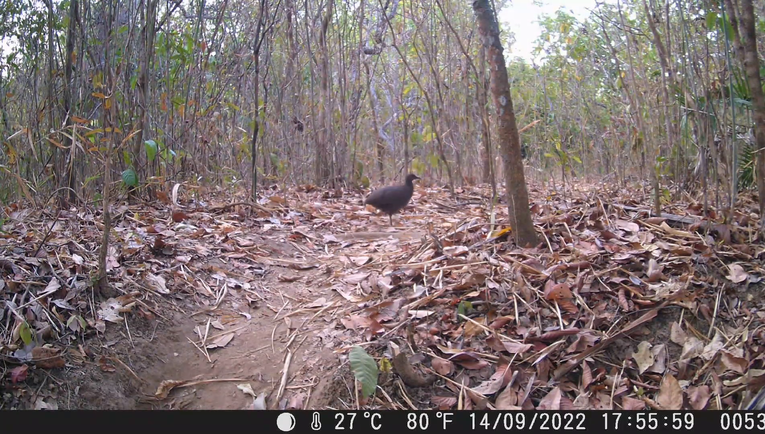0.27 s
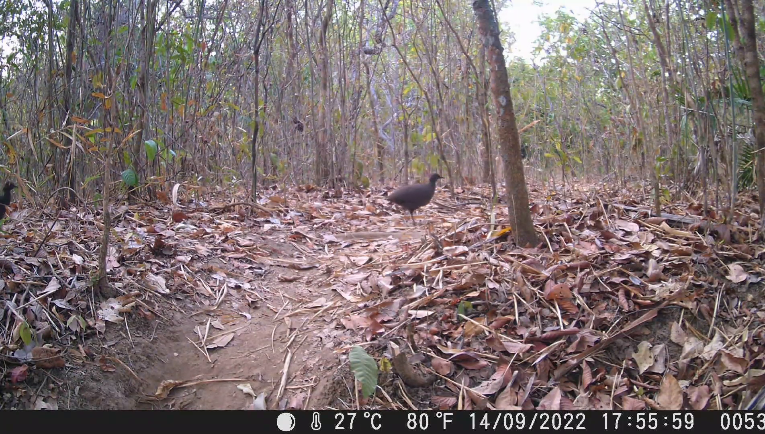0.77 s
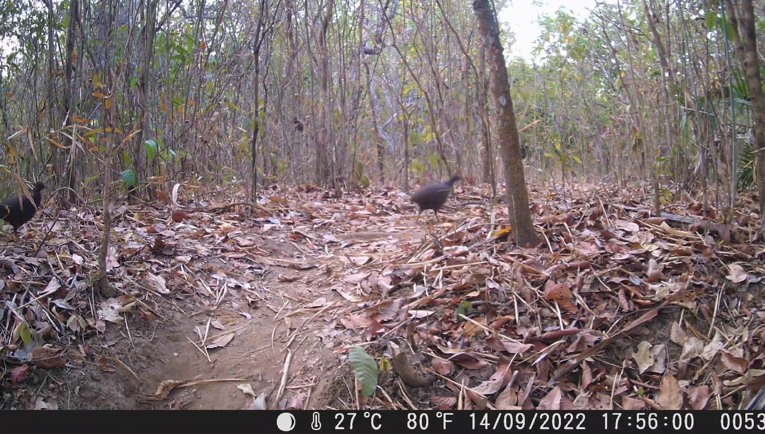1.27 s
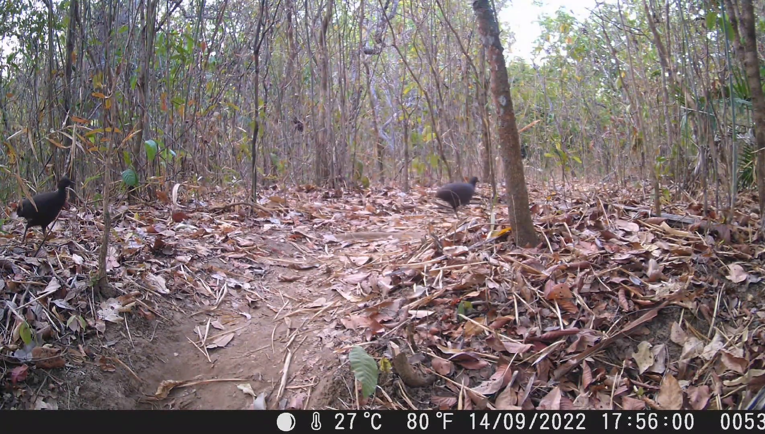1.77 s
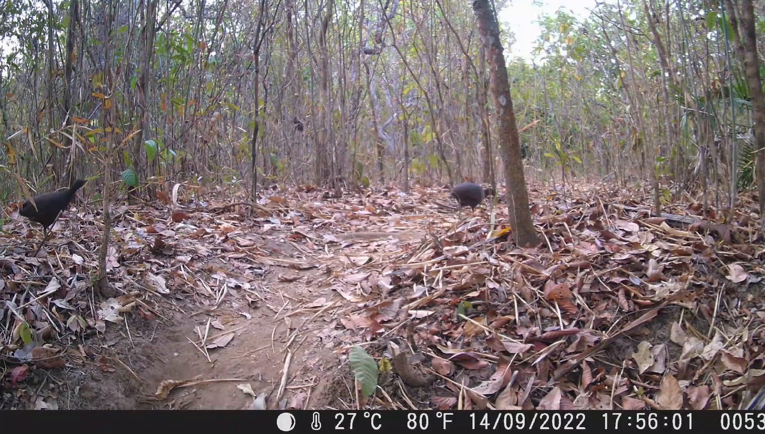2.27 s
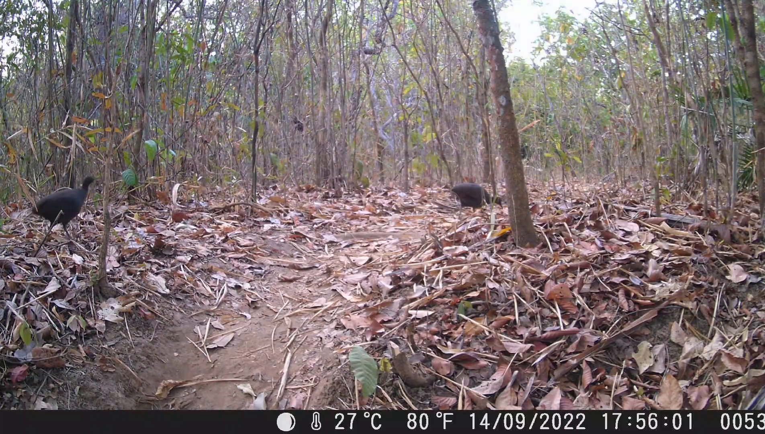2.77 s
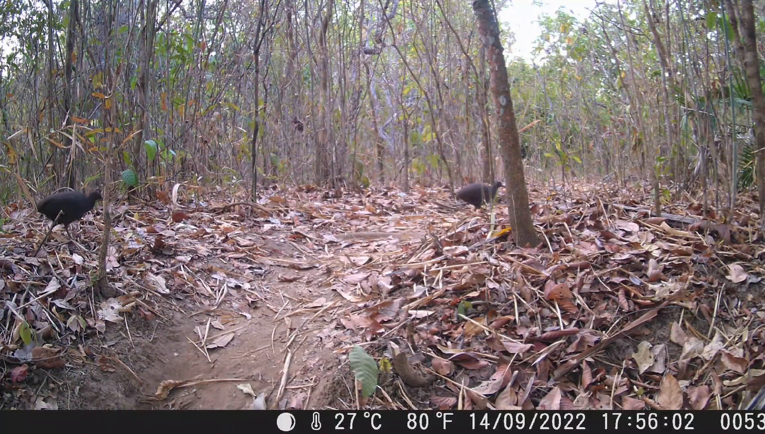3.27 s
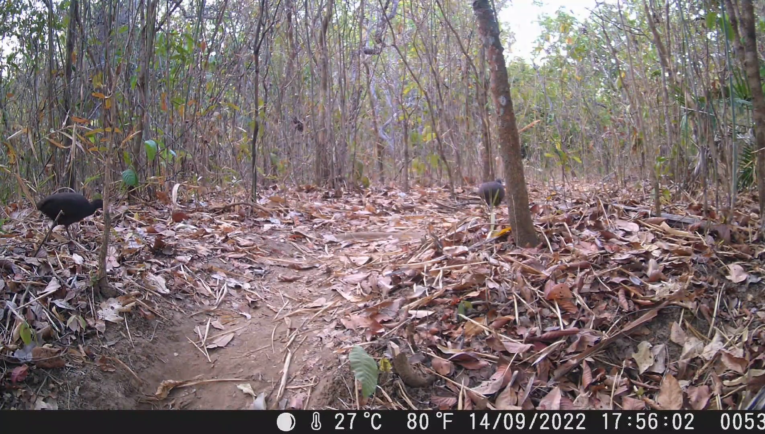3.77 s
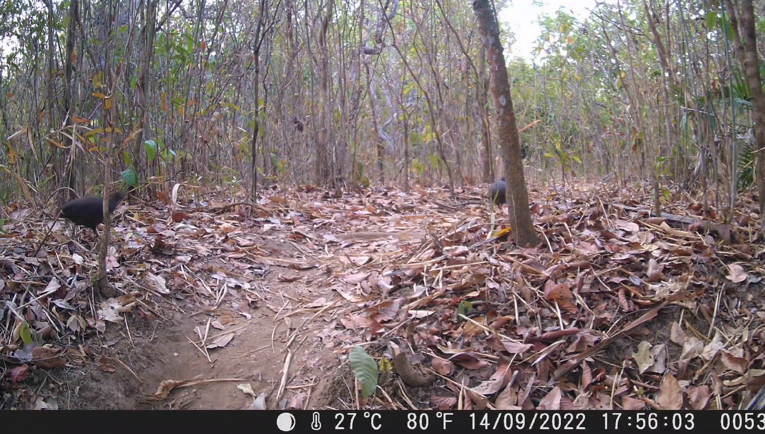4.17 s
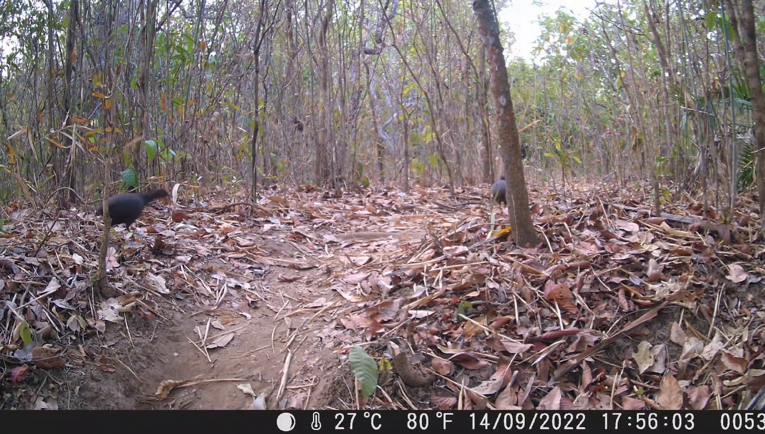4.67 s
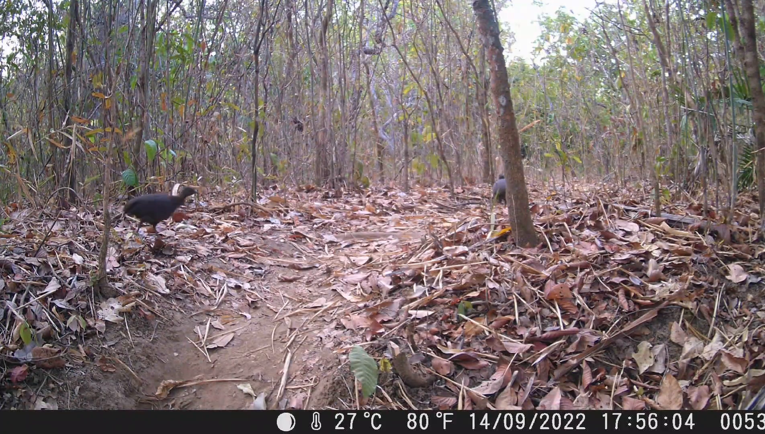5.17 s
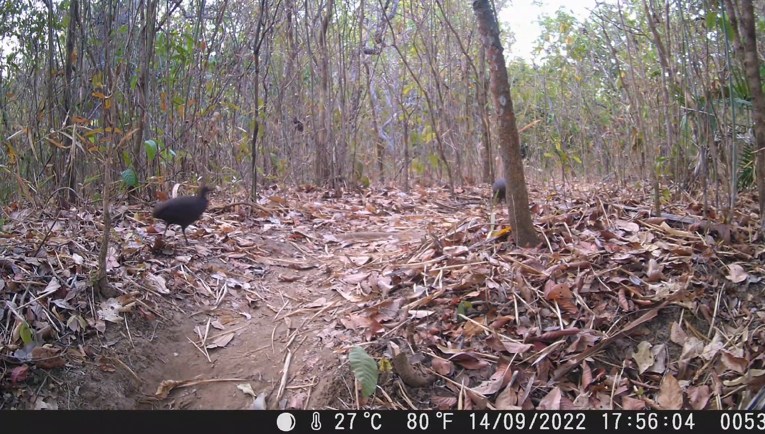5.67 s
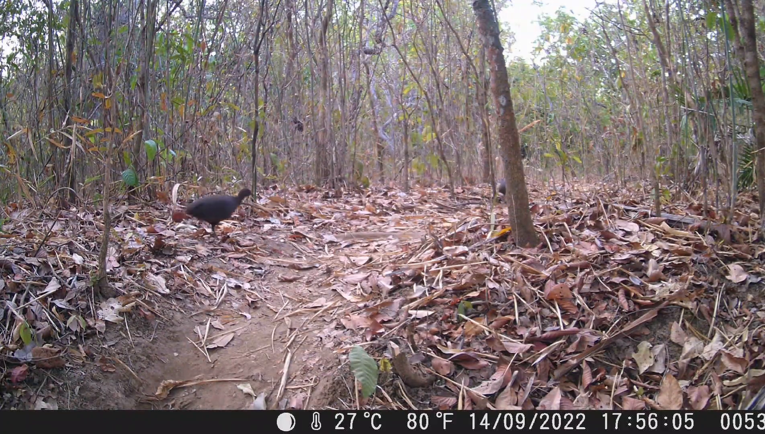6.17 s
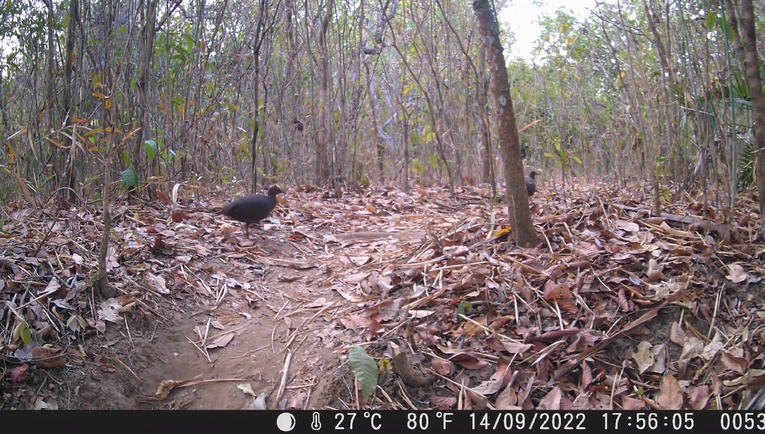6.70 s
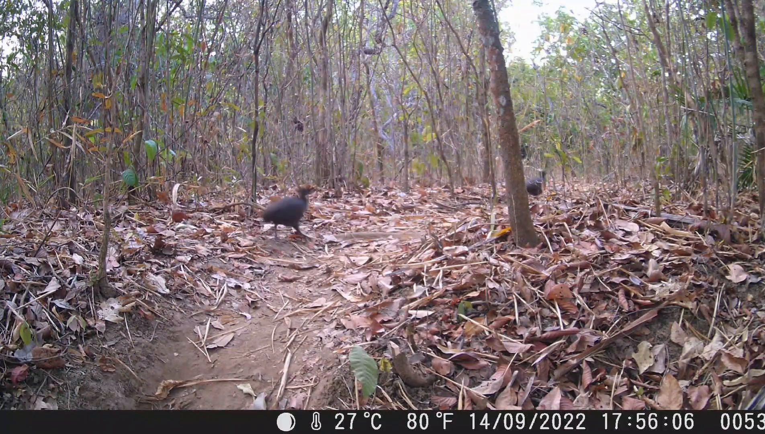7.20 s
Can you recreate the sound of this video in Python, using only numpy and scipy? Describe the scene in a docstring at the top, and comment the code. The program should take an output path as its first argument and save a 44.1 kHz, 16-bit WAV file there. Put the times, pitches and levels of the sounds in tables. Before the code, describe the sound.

Faint leaf rustle and a few sharp ticks accompany ground birds walking on dry litter, strongest near the start. Distant birdsong chirps and buzzes throughout with woodland echo. Two pure whistles come early; mid-way two nearer birds warble rapidly over each other, thin whistles slide down, and the whistle pair returns loudest, slightly gritty. Then only far song and a soft coo remain over a quiet, slightly dull hiss.

```python
"""Two near birds warble an overlapping duet in a dry thicket: near sines arching in pitch, coloured by a
reflection off the ground. A third bird gives level whistles that swell and settle; thin whistles fall; a
dove-like coo is two soft notes. Far birds repeat a motif of slurred, partly buzzing notes with chips and rasps,
echoed by noise-built trunks. Leaf ticks and rustle are noise bursts and crackles over a rumble that slopes
into hiss. The loudest whistle just overloads the narrow-band input."""
import sys
import numpy as np
from scipy import signal
from scipy.fft import rfft, irfft
from scipy.io import wavfile
from scipy.ndimage import uniform_filter1d

SR = 44100
rng = np.random.default_rng(int(sys.argv[2]) if len(sys.argv) > 2 else 0)


def persist_wave(psi):
    """Save psi, clipped to +-1, as 16-bit WAV."""
    counts = np.round(np.clip(psi, -1, 1) * 32767).astype(np.int16)
    wavfile.write(sys.argv[1], SR, np.atleast_2d(counts).T)


N = 328104

# far songs, one row per singing: [t/s, time stretch, pitch ratio, buzz ratio,
# then levels ahead of foliage and distance: chip/dB, dip/dB, arch/dB, drop/dB]
FAR_SONGS = [(-.19, 0.89, 1.034, 6.3, -58, -60, -45, -78), (.425, 1.026, 1, 2.15, -56.5, -55, -50, -58),
             (1.11, 0.97, 1, 1.05, -52.5, -51, -47.5, -55),
             (1.865, 1.05, 1.023, 0.57, -53.5, -51.5, -47.5, -54),
             (2.70, 1.04, 0.99, 1, -57, -68.5, -59, -71.5),
             (3.435, 1.01, .97, 0.86, -52.5, -58.5, -54.5, -59.5),
             (4.2, 1.1, 1, .9, -54.5, -59, -50.5, -72), (4.885, 1.23, 1.007, 0.76, -63.5, -72, -63.5, -76),
             (5.73, 1.08, 1.01, 0.95, -55.5, -58.5, -52, -70.5),
             (6.61, 0.98, .975, 1.1, -55.5, -54.5, -51.5, -55)]
# short replies, a chip and then one falling rasp, levels likewise:
# [t/s, chip f/Hz, chip level/dB, rasp pitch ratio, rasp level/dB]
FAR_REPLIES = [(.14, 2196, -63, 1.03, -57), (.785, 2254, -57.5, 0.98, -52.5), (6.065, 2400, -57, .95, -57),
               (6.318, 2105, -58, 1.03, -60.5)]


def from_db(db):
    """Decibels to amplitude."""
    return 10 ** (np.asarray(db) / 20)


def add(out, s, sound):
    """Mix a sound in at a time in seconds, trimming what falls outside the scene."""
    at = int(round(s * SR))
    sound = sound[max(-at, 0):max(N - at, 0)]
    out[max(at, 0):max(at, 0) + len(sound)] += sound


def drift(size, rate):
    """Random wander about zero: straight lines between normal draws, rate of them per second."""
    knots = rng.standard_normal(1000)
    return np.interp(np.arange(size) * rate / SR, np.arange(len(knots)), knots)


def progress(length_s):
    """Runs from 0 to 1 through a note."""
    return np.linspace(0, 1, int(length_s * SR))


def low_pass(x, hz):
    """Steep cut of the treble."""
    taps = signal.firwin(numtaps=301, cutoff=hz, fs=SR)
    return signal.fftconvolve(x, taps, "same")


def air():
    """Forest air and microphone hiss: steady noise, a rumble sloping into hiss."""
    # noise spectrum: [f/Hz, level/dB per Hz]
    air_spectrum = [(15, -67.5), (28, -63.5), (45, -75.5), (65, -74.5), (100, -83), (200, -88), (400, -95),
                    (600, -100), (900, -100), (1200, -104), (2400, -106), (3500, -111), (5300, -119),
                    (7000, -117), (8000, -115)]
    hz, db = np.transpose(air_spectrum)
    bins = np.maximum(np.arange(N // 2 + 1) * SR / N, 1)
    gain = from_db(np.interp(np.log(bins), np.log(hz), db))
    return irfft(rfft(rng.standard_normal(N)) * gain, N) * np.sqrt(SR / 2)


def litter(level_db=-72):
    """Walking birds stir the dry leaves: a soft rustle of tiny crackles, decaying noise at random moments."""
    # how much the leaves are stirred: [t/s, relative level/dB]
    stirring_levels = [(0, 0.5), (0.7, 7.5), (1.402, 2.5), (2.2, -23.5), (3.5, -3), (4.8, -20),
                       (5.998, -7.5), (7.401, -22)]
    struck = rng.random(N) < 320 / SR   # 320 a second on average
    clicks = struck * from_db(2 * np.minimum(rng.exponential(1, N), 3))
    decay = np.exp(-1 / (0.0047 * SR))
    crackle = signal.lfilter([1], [1, -decay], clicks + 1e-18) * rng.standard_normal(N)
    stirring = from_db(np.interp(np.arange(N) / SR, *np.transpose(stirring_levels)))
    leaf_band = signal.butter(1, [600, 2600], "band", fs=SR, output="sos")
    return from_db(level_db) * stirring * signal.sosfilt(leaf_band, crackle)


def syrinx(hz, gain, waver, second_db):
    """A near sine with a slightly unsteady pitch and a weak octave."""
    phase = 2 * np.pi * np.cumsum(hz * (1 + waver * drift(len(hz), rate=250))) / SR
    fade = signal.windows.tukey(len(hz), min(1, 0.0045 * SR / len(hz)))   # 4.5 ms, half at each end
    return np.sqrt(2) * gain * fade * (np.sin(phase) + from_db(second_db) * np.sin(2 * phase))


def sing(phrases, waver, second_db):
    """Pitch and effort glide through each phrase, their corners rounded by the muscles."""
    out = np.zeros(N)
    for phrase in phrases:
        s, hz, db = np.transpose(phrase)
        t = np.arange(s[0], s[-1], 1 / SR)
        hz = uniform_filter1d(np.interp(t, s, hz), size=260)
        db = uniform_filter1d(np.interp(t, s, db), size=260)
        add(out, s[0], syrinx(hz, from_db(db), waver, second_db))
    return out


def distant_whistle():
    """A very distant bird holds one nearly level, fading pitch."""
    # one phrase: [t/s, f/Hz, level/dB]
    distant_phrases = [
        [(0, 1185, -79), (.15, 1182, -76), (.4, 1176, -92)],
    ]
    return sing(distant_phrases, waver=0.0064, second_db=-43)


# far birds' overtone at a pitch of 2 kHz; its change per octave of pitch
FAR_OCTAVE_DB, OCTAVE_SLOPE_DB = -13.5, -16


def slur(bend, db, buzz, octave_db, trill_hz=150, upper_ratio=1.14, upper_db=-11, buzzy=0.052):
    """One note along a pitch bend; buzzy ones trill fast and bring in the other side of the syrinx."""
    u = np.linspace(0, 1, len(bend))
    trill_rate = trill_hz * (1 + 0.367 * drift(len(u), rate=120))
    trill = np.sin(2 * np.pi * np.cumsum(trill_rate) / SR)
    hz = bend * (1 + buzz * trill * (1 - u))   # the buzz clears into a pure tone
    gain = from_db(db) * np.abs(np.sin(np.pi * u)) ** 0.32
    overtone_db = octave_db + OCTAVE_SLOPE_DB * np.log2(hz / 2000)   # foliage swallows high overtones
    upper_gain = gain * from_db(upper_db) * min(buzz / buzzy, 1) ** 2 * 2 * (1 - u)
    main_side = syrinx(hz, gain, waver=0.0069, second_db=overtone_db)
    other_side = syrinx(upper_ratio * hz, upper_gain, waver=0.017, second_db=-42)
    return main_side + other_side


def bend_through(pitches, length_s):
    """A smooth glide through a start, a middle and an end pitch."""
    return np.polyval(np.polyfit([0, .5, 1], pitches, 2), progress(length_s))


def far_songs():
    """The slurred motif returns at its own pace and pitch, with low sagging tones and rasping replies."""
    # short buzz, dip, arch and drop, ahead of each song's stretch and ratios:
    # [t after song start/s, length/s, start f/Hz, middle f/Hz, end f/Hz, buzz as share of pitch]
    motif = [(.028, .045, 3820, 3880, 3650, .085), (.058, .11, 3400, 3010, 2942, .02),
             (.14, .1, 3342, 3557, 3350, 0.043), (.218, .09, 3400, 2800, 2520, .03)]
    # low tones that sag and level off; most are birds' closing notes, the one at 3.966 s is only
    # a stray blip and no bird: [t/s, length/s, final f/Hz, sag/Hz, level ahead of foliage/dB]
    sagging_tones = [ (0.232, 0.065, 2053, 403, -56.5), (1.421, .135, 2060, 88.6, -54.5),
                     (1.538, 0.071, 1953, 159.5, -56), (1.649, .14, 1960, 60, -70.5),
                     (2.198, 0.082, 2172, 399, -55), (2.311, 0.06, 2240, 178, -61.5),
                     (2.373, 0.075, 2050, 131, -59), (3.05, 0.073, 2350, 102.6, -63.5),
                     (3.16, .06, 2077, 200.5, -66), (3.766, 0.18, 1897, 139, -59.5),
                     (3.966, 0.031, 1948, 149, -53), (5.226, 0.038, 2285, 150, -60.5),
                     (5.283, 0.0644, 2283, 135, -61), (5.382, 0.11, 1866, 262, -63),
                     (6.405, 0.048, 1971, 403, -58), (6.93, 0.097, 1961, 321, -60),
                     (7.022, .043, 2290, 50, -61), (7.118, 0.12, 1866, 244, -63.5)]
    # one falling rasp, ahead of each reply's pitch ratio: columns as in the motif, t after the reply's start
    rasp = (0.04, 0.072, 3680, 3100, 2720, .17)
    buzz_db = -7   # the short buzz, relative to the dip
    sag_power, sagging_buzz, sagging_octave_db = 2.3, .005, -14
    out = np.zeros(N)
    for s, stretch, ratio, rough, _, dip_db, arch_db, drop_db in FAR_SONGS:
        levels = (dip_db + buzz_db, dip_db, arch_db, drop_db)
        for (after, length, *pitches, buzz), db in zip(motif, levels):
            bend = ratio * bend_through(pitches, stretch * length)
            add(out, s + stretch * after, slur(bend, db, rough * buzz, FAR_OCTAVE_DB))
    for s, length, hz, sag_hz, db in sagging_tones:
        bend = hz + sag_hz * (1 - progress(length)) ** sag_power
        add(out, s, slur(bend, db, sagging_buzz, sagging_octave_db))
    after, length, *pitches, buzz = rasp
    for s, _, _, ratio, db in FAR_REPLIES:
        bend = ratio * bend_through(pitches, length)
        add(out, s + after, slur(bend, db, buzz, FAR_OCTAVE_DB))
    return out


def foliage(x):
    """Leaves and stems colour distant voices, thinning parts of the treble."""
    # gain on the way through: [f/Hz, gain/dB]
    foliage_gain = [(2000, 2.5), (2800, -1), (3100, -3.5), (3400, -1.5), (3800, 0), (4400, -0.5),
                    (5100, -12), (6000, -1.5), (7000, -0.5)]
    hz, db = np.transpose(foliage_gain)
    bins = np.arange(N // 2 + 1) * SR / N
    return irfft(rfft(x) * from_db(np.interp(bins, hz, db)), N)


def forest(x, t60, build_s, flutter_db=4.5):
    """Trunks scatter the sound: echoes come in uneven clumps, build up, then die away; unit energy."""
    t = np.arange(SR) / SR
    clumps = from_db(flutter_db * drift(SR, rate=69.6))
    envelope = from_db(-60 * t / t60) * (1 - np.exp(-t / build_s))
    echoes = rng.standard_normal(SR) * clumps * envelope
    return signal.fftconvolve(x, echoes / np.linalg.norm(echoes))[:N]


def opening_chips():
    """Songs and replies open with a chip that swells briefly as it flicks up to its top pitch."""
    song_chip_hz, chip_s, rise = 2377, .041, 0.11   # top pitch, length, rise as share of the pitch
    out, u = np.zeros(N), progress(chip_s)
    song_chips = [(s, song_chip_hz, db) for s, _, _, _, db, *_ in FAR_SONGS]
    reply_chips = [reply[:3] for reply in FAR_REPLIES]
    for s, hz, db in song_chips + reply_chips:
        pitch = hz * (1 - rise * (1 - u) ** 3)
        gain = from_db(db) * np.sin(np.pi * u) ** 2
        add(out, s, syrinx(pitch, gain, waver=0.012, second_db=-17))
    return out


def leaf_ticks(t60=0.0083):
    """A dry leaf snaps under a foot: a brief bright noise burst."""
    # leaf snaps: [t/s, peak level ahead of the bass cut/dB]
    leaf_snaps = [(.462, -59), (.642, -48), (1.017, -59), (1.137, -60), (2.479, -46.5), (2.712, -50),
                  (3.535, -70)]
    out, t = np.zeros(N), np.arange(SR // 20) / SR
    for s, db in leaf_snaps:
        burst = rng.standard_normal(len(t)) * from_db(-60 * t / t60)
        add(out, s, from_db(db) * burst / np.abs(burst).max())
    return signal.sosfilt(signal.butter(1, 1500, "high", fs=SR, output="sos"), out)


def whistle(waver, second_db):
    """Each whistle swells while it settles on its pitch, holds, then sags as it is let go."""
    # a low and a high one in turn: [t/s, length/s, held f/Hz, start above it/Hz, level/dB]
    level_whistles = [(0.646, .153, 2433, 25.5, -31), (1.213, 0.19, 2566, 198.5, -30),
                      (3.773, 0.15, 2413, -9, -25), (4.34, 0.2, 2536, 239.5, -28)]
    start_db = -27   # the swell begins this far below the held level
    attack_s, release_s, settle_s, end_sag_hz = 0.093, 0.029, 0.031, 60.8
    out = np.zeros(N)
    for s, length, hz, above_hz, db in level_whistles:
        t = length * progress(length)
        still_to_swell = np.cos(np.pi / 2 * np.minimum(t / attack_s, 1)) ** 1.7
        swell = from_db(start_db * still_to_swell)
        release = np.clip(1 - (length - t) / release_s, 0, 1)
        pitch = hz + above_hz * np.exp(-t / settle_s) - end_sag_hz * release ** 2
        gain = from_db(db) * swell * (1 - release ** 1.4)
        add(out, s, syrinx(pitch, gain, waver, second_db))
    return out


def dove():
    """The same soft two-note coo, louder or softer."""
    # a rising note and a short one: [t after coo start/s, f/Hz, level relative to the coo/dB]
    coo_notes = [
        [(0, 282.5, -9), (.035, 369.6, -1.5), (.07, 404.3, 1.5), (.11, 422, -7), (.13, 423, -9.5)],
        [(.185, 390, -6.5), (.21, 401, 2), (.24, 390, -25)],
    ]
    # each coo: [t/s, level/dB]
    coo_times = [(1.075, -54.5), (2.9, -66.5), (5.81, -55)]
    notes = [np.array(note) + (s, 0, db) for s, db in coo_times for note in coo_notes]
    return sing(notes, waver=0.012, second_db=-22)


def trunk_echo(x, delay_s, db):
    """One distinct reflection off a nearby tree."""
    out = np.zeros(N)
    add(out, delay_s, from_db(db) * x)
    return out


def warble(notes, waver, second_db, legato_s=.003):
    """Notes arch up to a top pitch and back; one that follows at once is slurred from the last one's foot."""
    # ground reflection, gain by pitch, strongest near 1750 Hz: [f/Hz, gain/dB]
    ground_reflection = [(1200, -12.5), (1450, -4.5), (1620, -6.5), (1750, 1.5), (1850, -5.5), (1950, -4.5)]
    arch_power, foot_loss_db = 1.6, -11   # flatness of a soft arch's top; effort lost at its feet
    held_s = .05   # shorter notes have little time to hold
    shallow_hz = 450   # arches shallower than this lose less effort
    max_rise_hz_per_s = 12000   # a note that peaks early has to start high
    # notes louder than this hold their top longer and turn down more sharply
    soft_db, flatter_per_db = -38.5, 0.22
    times, pitches, efforts, last_end, last_foot = [], [], [], 0, 0
    next_starts = [note[0] for note in notes[1:]] + [N / SR]
    for (s, length, top_at, top_hz, foot_hz, db), next_s in zip(notes, next_starts):
        length = min(length, next_s - s)
        u, top_at = progress(length), np.clip(top_at, .05, .95)
        rising = u < top_at
        flatness = arch_power + flatter_per_db * max(db - soft_db, 0) * min(length / held_s, 1) ** 2
        if s - last_end < legato_s:
            first_hz = last_foot
        else:
            first_hz = max(foot_hz, top_hz - max_rise_hz_per_s * top_at * length)
        from_top = np.where(rising, 1 - u / top_at, (u - top_at) / (1 - top_at)) ** flatness
        pitch = top_hz - (top_hz - np.where(rising, first_hz, foot_hz)) * from_top
        depth = (top_hz - pitch) / max(top_hz - foot_hz, shallow_hz)
        times.append(s + length * u)
        pitches.append(pitch)
        efforts.append(from_db(db + foot_loss_db * depth))
        last_end, last_foot = s + length, foot_hz
    hz = np.interp(np.arange(N) / SR, np.concatenate(times), np.concatenate(pitches))
    gain = np.zeros(N)
    for t, effort in zip(times, efforts):
        add(gain, t[0], effort)
    gain = gain * from_db(np.interp(hz, *np.transpose(ground_reflection)))
    hz, gain = uniform_filter1d(hz, size=200), uniform_filter1d(gain, size=200)
    return syrinx(hz, gain, waver, second_db)


def warbled_duet():
    """A leading warbler and its lower, overlapping partner, every note an arch of pitch."""
    # leader: [t/s, length/s, top at share of the length, top f/Hz, foot f/Hz,
    # level ahead of the ground reflection/dB]
    lead_notes = [ (2.691, 0.075, 0.15, 1856, 1700, -38.5), (2.757, 0.083, 0.68, 1840, 1720, -34),
                  (2.843, 0.034, 0.71, 1747, 1420, -35), (2.883, 0.032, .5, 1650, 1340, -36.5),
                  (2.921, 0.03, 0.57, 1575, 1340, -36.5), (2.958, 0.044, 0.46, 1544, 1388, -37.5),
                  (2.992, 0.093, 0.69, 1743, 1575, -38), (3.289, 0.058, 0.19, 1835, 1408, -32.5),
                  (3.348, 0.066, 0.56, 1835, 1450, -34), (3.491, 0.052, 0.09, 1872, 1754, -30.5),
                  (3.537, 0.1, 0.55, 1855, 1500, -30), (3.63, .04, .45, 1640, 1220, -35),
                  (3.69, .053, 0.46, 1815, 1440, -32.5), (3.77, 0.12, 0.33, 1827, 1470, -35.5),
                  (4.008, .049, 0.18, 1878, 1250, -28), (4.064, 0.061, 0.64, 1788, 1250, -33),
                  (4.16, .139, .27, 1620, 1356, -36), (4.386, 0.052, 0.61, 1770, 1300, -36.5),
                  (4.472, 0.12, 0.27, 1661, 1160, -35)]
    # partner: [t/s, length/s, top at share of the length, top f/Hz, foot f/Hz,
    # level ahead of the ground reflection/dB]
    partner_notes = [ (3.437, .143, .52, 1765, 1414, -32.5), (3.674, 0.027, 0.63, 1460, 1210, -36.5),
                     (3.71, .032, 0.66, 1390, 1175, -39.5), (3.747, 0.025, .52, 1380, 1219, -41),
                     (3.777, 0.029, 0.38, 1450, 1383, -37.5), (3.808, .056, 0.47, 1655, 1254, -34.5)]
    lead = warble(lead_notes, waver=0.0035, second_db=-49.0)
    partner = warble(partner_notes, waver=0.0022, second_db=-56.5)
    return lead + partner


def falling_whistles(waver, second_db):
    """A thin slide, steepest at first, that swells twice on the way down."""
    # slides: [t/s, length/s, start f/Hz, end f/Hz, bend (1 = straight), level ahead of the swells/dB]
    slides = [(3.111, 0.2, 5100, 3160, 0.73, -62), (3.466, 0.17, 4950, 3253, .52, -53.5)]
    gain_through_db = 10   # they gain this much from start to end
    out = np.zeros(N)
    for s, length, start_hz, end_hz, bend, db in slides:
        u = progress(length)
        pitch = start_hz + (end_hz - start_hz) * u ** bend
        swells = np.abs(np.sin(2 * np.pi * u))
        gain = from_db(db + gain_through_db * (u - .5)) * swells
        add(out, s, syrinx(pitch, gain, waver, second_db))
    return out


def scene():
    """Far songs and chips echo most, near voices less; the distant whistle comes straight."""
    duet = warbled_duet()
    whistles = whistle(waver=0.00053, second_db=-45.5)
    falls = falling_whistles(waver=0.0099, second_db=-38.0)
    coos = dove()
    chipping, slurring = foliage(opening_chips()), foliage(far_songs())
    near = duet + whistles + falls + coos + leaf_ticks() + litter()
    far = chipping + from_db(-4) * slurring + distant_whistle()   # straight paths

    near_echoes = trunk_echo(duet, delay_s=.03, db=-19)
    near_echoes += forest(from_db(-21.0) * duet, t60=0.55, build_s=0.021)
    middle_voices = from_db(-12.5) * falls + from_db(-13) * coos
    middle_echoes = forest(middle_voices, t60=0.24, build_s=0.021)
    whistle_echoes = trunk_echo(whistles, delay_s=.055, db=-25.5)
    whistle_echoes += forest(from_db(-19) * whistles, t60=0.32, build_s=0.013)
    far_voices = from_db(2.5) * chipping + from_db(-1.0) * slurring
    far_echoes = forest(far_voices, t60=0.66, build_s=0.0027)
    echoes = near_echoes + middle_echoes + whistle_echoes + far_echoes
    return (near + far + echoes + air())[None]


def record(dry, overload_db=-25.5, grit=0.0054, hiss_db=-90):
    """A narrow-band input; above its overload level the treble gains a squared-off edge; a faint hiss follows."""
    input_top_hz, cutoff_hz = 8250, 15700
    narrow = low_pass(dry[0], input_top_hz)
    treble = narrow - low_pass(narrow, 2000)
    power = np.abs(uniform_filter1d(treble ** 2, size=400))
    level_db = 10 * np.log10(power + 1e-12)
    overload = np.clip(2 * (level_db - overload_db), 0, 1)   # full within half a dB
    edge = grit * overload * np.tanh(treble / 0.012)
    hiss = from_db(hiss_db) * rng.standard_normal(N)
    return low_pass(narrow + edge + hiss, cutoff_hz)[None]


dry = scene()
out = record(dry)
persist_wave(out)
```